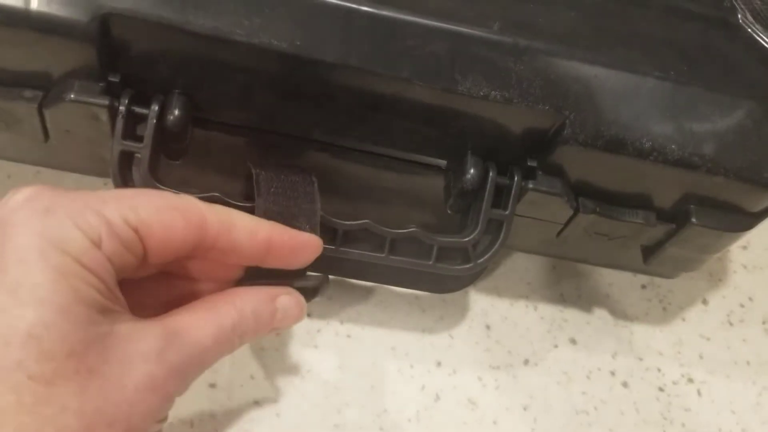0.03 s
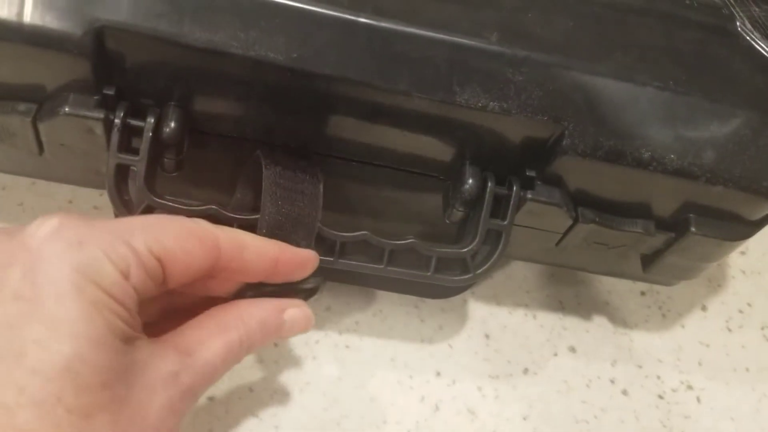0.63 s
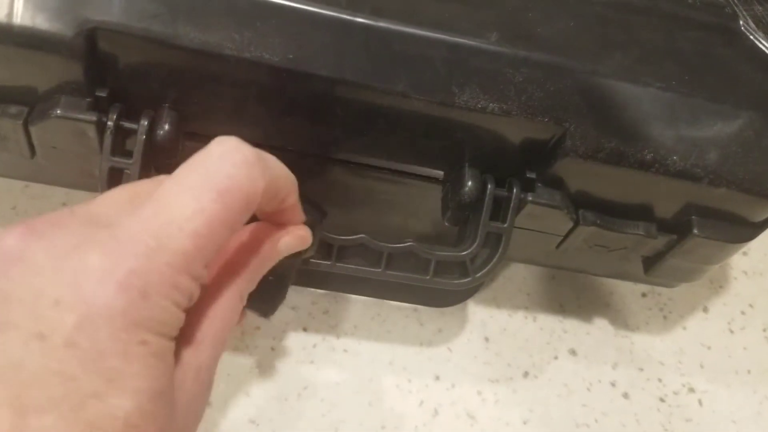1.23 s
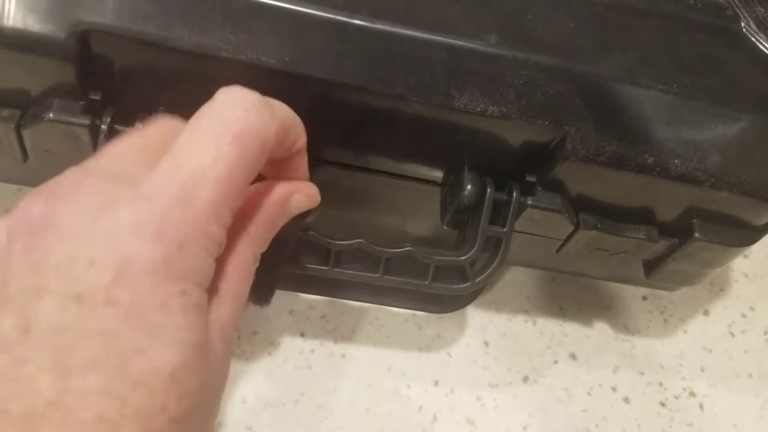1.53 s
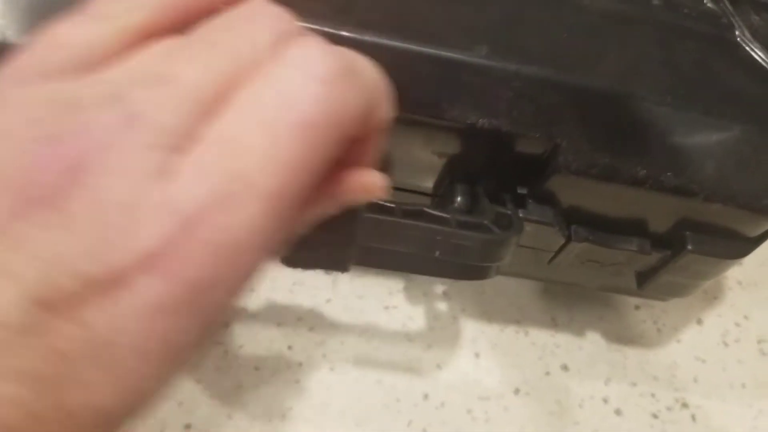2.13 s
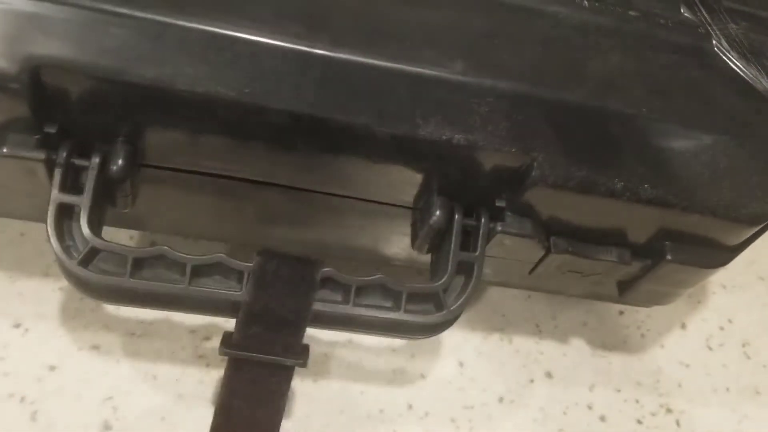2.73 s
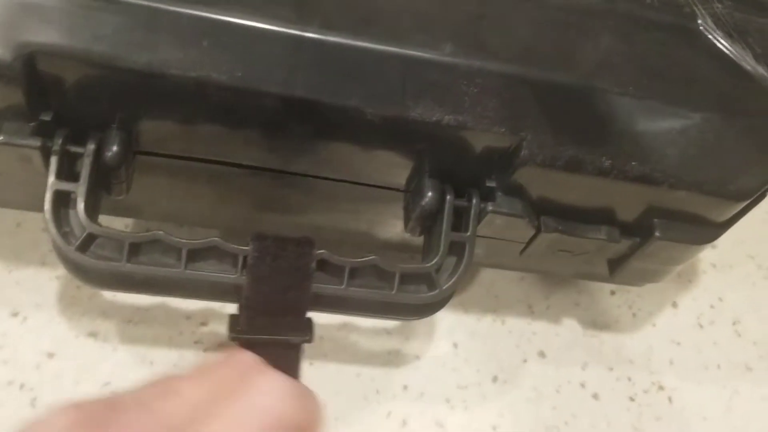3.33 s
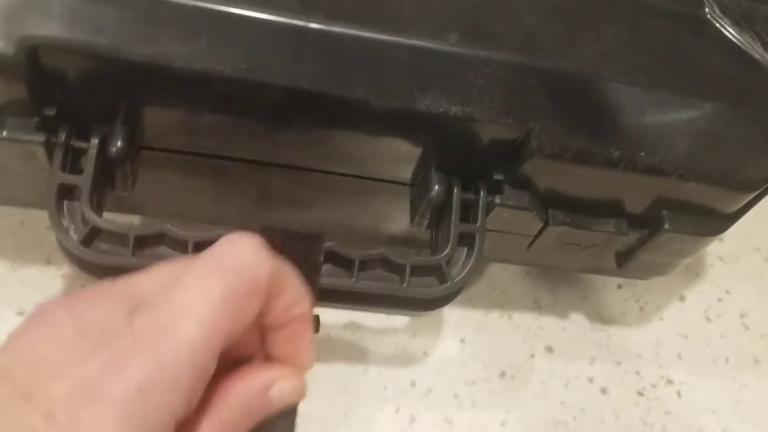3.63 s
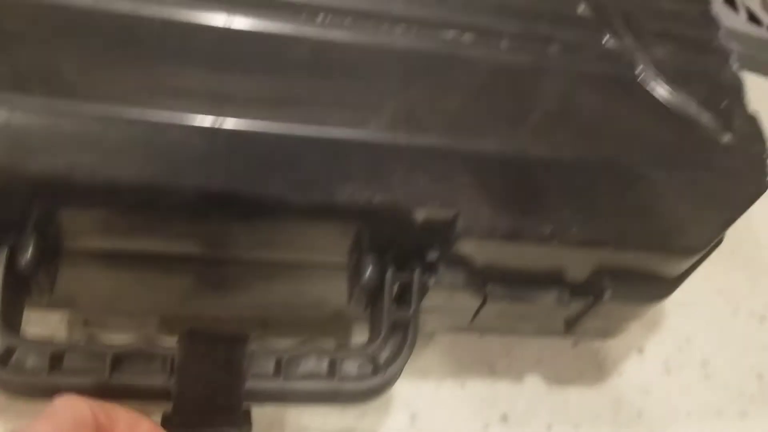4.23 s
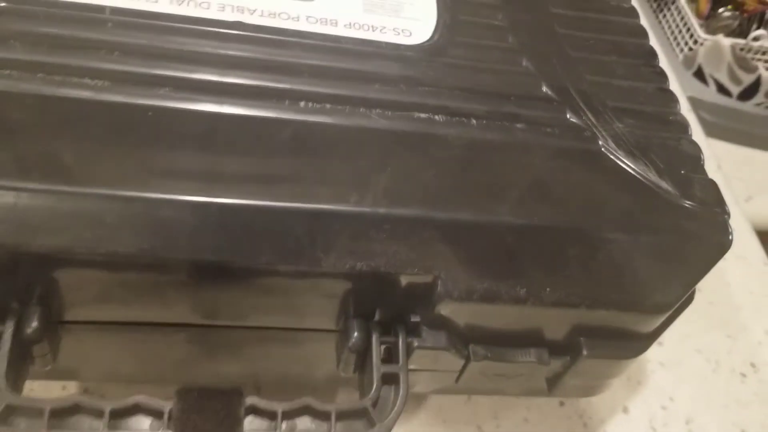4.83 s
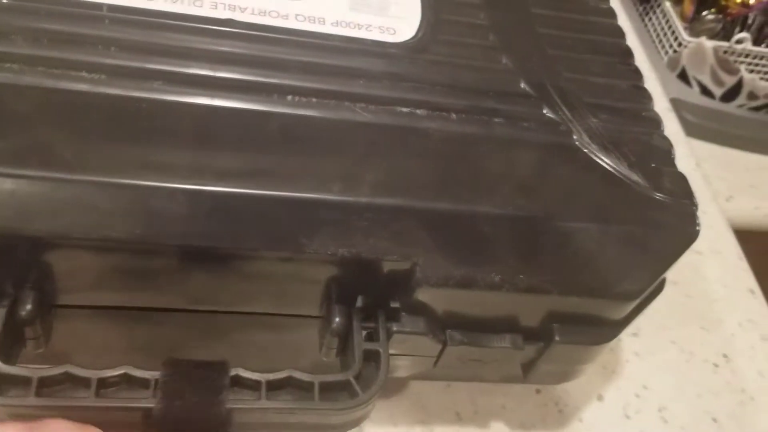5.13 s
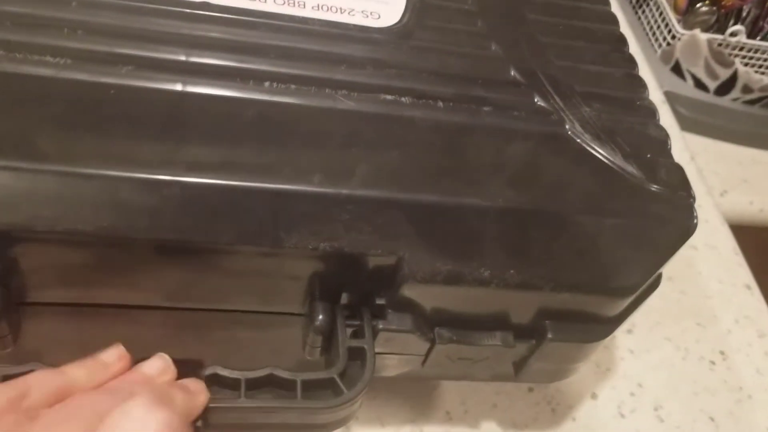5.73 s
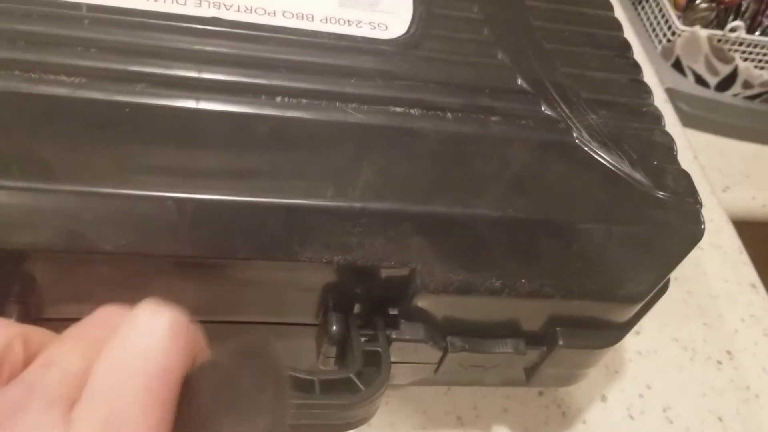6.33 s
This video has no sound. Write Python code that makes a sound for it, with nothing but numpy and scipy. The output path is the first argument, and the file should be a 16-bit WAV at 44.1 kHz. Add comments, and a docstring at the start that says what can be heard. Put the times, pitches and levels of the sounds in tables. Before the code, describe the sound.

A hook-and-loop strap is threaded around the hinged handle of a hollow plastic case. Faint ticks and a soft slide of webbing build, about two seconds in, to a cluster of hollow knocks, rattles and a short rasping rip. Lighter taps follow, then more brief crackles and a sharp snap as fingers press the strap shut. It is all heard close up in a small, quiet room.

```python
"""Fastening a hook-and-loop strap

A strap is threaded round the plastic handle of a portable grill case on a kitchen counter and pressed shut.
Hooks snap one by one and tear loose in short rips, the webbing slides, fingers shift it, and a soft hiss of
faint breathing and light rubbing comes and goes. The hinged handle knocks and judders, making the hollow case
ring. Two close microphones hear it all in a small, quiet room."""
import sys
import numpy as np
from scipy import signal
from scipy.fft import rfft, irfft
from scipy.io import wavfile
from scipy.ndimage import uniform_filter1d

SR = 44100
rng = np.random.default_rng(int(sys.argv[2]) if len(sys.argv) > 2 else 0)


def store_pcm(level_fs):
    """Save levels as 16-bit WAV."""
    pcm = np.round(np.clip(level_fs, -1, 1) * 32767).astype(np.int16)
    wavfile.write(sys.argv[1], SR, np.atleast_2d(pcm).T)


N = 285369
TIME = np.arange(N) / SR

# Levels in tables are relative. A "t60" is the time in seconds a sound takes to fade by 60 dB.
# the tone of a hook letting go: f/Hz, level/dB
HOOK_TONE = [(50, -29.5), (200, -11.5), (1000, -15), (2800, -5), (4300, 3), (5500, 0.5), (7200, 1),
             (8500, -2.5), (10500, -0.5), (12500, 0.5), (15000, 3.5), (16500, -6.5)]
# the handle hitting the case: t/s, weight/dB, hardness/dB, panel pitch/Hz
HANDLE_KNOCKS = [(0.095, -36, -39, 1170), (.151, -66, -46.5, 1940), (.862, -59, -49, 1870),
                 (0.912, -47.5, -59, 1900), (1.295, -37.5, -44.5, 1250), (1.524, -41.5, -52.5, 1580),
                 (1.654, -35.5, -38.5, 1190), (1.84, -32.5, -41.5, 1340), (1.878, -36, -40.5, 1090),
                 (1.923, -38, -32, 1130), (1.946, -27.5, -30.5, 1110), (1.983, -24, -33, 1960),
                 (2.02, -35.5, -37, 1080), (2.177, -22, -31.5, 1580), (2.229, -26, -26.5, 1030),
                 (2.253, -24.5, -27.5, 1060), (2.297, -27, -58, 1060), (2.402, -36.5, -56.5, 2130),
                 (2.485, -31, -42, 1160), (2.531, -36, -38.5, 900), (2.567, -23, -43, 845),
                 (2.587, -21.5, -34, 1170), (2.624, -26, -52, 880), (2.662, -30, -32, 1250),
                 (2.685, -21.5, -49, 1290), (2.701, -32, -33.5, 880), (2.856, -29.5, -48, 1020),
                 (2.95, -25.5, -37, 1530), (3.118, -33.5, -43, 860), (3.235, -36.5, -61, 1100),
                 (3.488, -45, -43, 2160), (3.518, -32.5, -35.5, 1640), (3.548, -41, -49, 1560),
                 (3.687, -27, -37, 870), (4.017, -44.5, -64, 1080), (4.339, -32.5, -58.5, 930),
                 (4.489, -38, -55, 1510), (4.606, -30.5, -42.5, 1580), (4.645, -33, -42.5, 1220),
                 (4.73, -29.5, -36.5, 1600), (4.801, -30.5, -38.5, 1450), (4.853, -29, -42, 910),
                 (4.918, -67, -42, 1040), (4.995, -30, -42, 1010), (5.084, -39, -59, 1110),
                 (5.157, -35, -43.5, 1440), (5.259, -29, -28.5, 950), (5.436, -24.5, -37, 1370),
                 (5.602, -32, -67, 870), (5.743, -40, -60, 980), (6.071, -41.5, -55.5, 1160),
                 (6.266, -30.5, -54, 1020), (6.306, -24.5, -51.5, 846), (6.342, -70, -39.5, 1160)]
# the notes (modes) at which the hollow case and handle ring: f/Hz, level/dB, t60/s
CASE_MODES = [(118.1, -17, 0.38), (157.7, -5.5, 0.14), (198, -7, 0.041), (313.6, -4, 0.055),
              (335.2, 0, 0.11), (406, -8.5, 0.043), (517, -9, 0.027), (637.4, -2, 0.092), (733, -14, 0.072),
              (969, -13, 0.023), (1062.6, -11.5, 0.082), (1195, -15, 0.092), (1274, -16.5, 0.065),
              (1340, -13.5, 0.024), (1580, -15.5, 0.054), (1710, -29.5, 0.017), (2080, -13.5, 0.04),
              (2240, -33.5, 0.066)]
# the tone of plastic hitting plastic: f/Hz, level/dB
CLACK_TONE = [(60, -38), (200, -9.5), (450, -0.5), (700, 1), (1300, -1.5), (2050, 0), (2550, -11),
              (5000, -17), (16000, -63)]


def hook_snaps(flutter_t60=0.021, stretch=0.14, click_db=14, ring_db=5, level_db=-15):
    """A hook springs free: a click, then fibres flutter. Loud snaps drag others along and last longer."""
    # single hooks letting go and small dry ticks: t/s, level/dB, f/Hz
    snaps = [(0.152, -39, 4650), (0.528, -20, 13900), (0.5363, -20, 14200), (0.5732, -27, 14100),
             (.584, -27, 6900), (0.5913, -18.5, 9400), (0.62, -26, 6100), (0.6402, -32, 7540),
             (.656, -30, 6700), (.715, -32, 6500), (.762, -25, 14000), (0.7712, -25, 5700),
             (0.915, -28.5, 6000), (0.9234, -30, 5330), (.9938, -31, 14100), (1.217, -32, 14000),
             (1.2818, -31, 14500), (1.4153, -33.5, 6000), (1.6487, -32.5, 4840), (1.7156, -31, 4100),
             (1.7766, -20, 5300), (1.8136, -29, 6260), (1.8449, -22, 4850), (1.954, -18.5, 13000),
             (1.9898, -7.5, 15200), (2.0195, -13, 15600), (2.1519, -37, 4550), (2.237, -10, 4600),
             (2.357, -35.5, 13000), (2.4826, -34.5, 4430), (2.537, -30.5, 3900), (2.567, -23, 3820),
             (2.589, -22, 4540), (2.6, -26, 4480), (2.624, -25.5, 3950), (2.6632, -24.5, 3870),
             (2.6858, -30.5, 5600), (2.704, -29, 3600), (2.8587, -38.5, 4300), (3.235, -35.5, 6300),
             (3.3646, -28, 7000), (3.46, -36, 6550), (3.5163, -35.5, 6400), (3.652, -32, 5900),
             (3.958, -34.5, 6860), (4.0198, -16, 4100), (4.1139, -27.5, 12400), (4.369, -24.5, 14600),
             (4.3988, -22.5, 15500), (4.423, -26.5, 13300), (4.4398, -23.5, 16100), (4.4647, -31.5, 4960),
             (4.473, -31, 14500), (4.5896, -14.5, 13800), (4.792, -26, 7200), (5.2599, -11.5, 6940),
             (5.8214, -27.5, 12900)]
    out, t = np.zeros((2, N)), TIME[:600]
    typical_db = np.median(np.array(snaps)[:, 1])
    for start, db, hz in snaps:
        t60 = flutter_t60 * from_db(stretch * (db - typical_db))
        flutter = noise_pair(len(t), alike_below_hz=16000) * decay(t, t60)
        burst = colour(flutter + from_db(click_db) * (t == 0), HOOK_TONE)
        burst = burst + from_db(ring_db) * resonate(burst, hz, hz / 3)
        top_hz = min(2.6 * hz, .45 * SR)   # a low snap reaches less far into the treble
        burst = signal.sosfilt(signal.butter(2, top_hz, fs=SR, output="sos"), burst)
        add(out, start, from_db(db + level_db) * unit_rms(burst))
    return out


def strap_pulls(webbing_db=-4, taut_db=6, taut_width_hz=450):
    """With each pull, hooks tear in a dense crackle while the taut weave rasps through the buckle."""
    # pulls, rising and falling by 20 dB: peak t/s, rise/s, fall/s, tearing/dB, sliding/dB, f/Hz
    pulls = [(0.789, 0.01, 0.069, -42, -44.5, 1640), (1.434, 0.0088, 0.026, -54, -42.5, 4800),
             (1.594, 0.08, 0.0074, -38.5, -36, 4800), (1.599, 0.014, 0.032, -41, -25.5, 1700),
             (1.778, 0.0068, 0.062, -52, -35.5, 4700), (1.986, 0.12, 0.035, -51, -39, 1470),
             (2.034, 0.028, 0.033, -27.5, -32, 3700), (2.153, 0.0067, 0.03, -22.5, -33, 3830),
             (2.167, 0.012, 0.051, -23, -20, 4420), (2.183, 0.0041, 0.027, -14.5, -15.5, 5400),
             (2.194, .0053, 0.049, -53, -22, 1370), (2.238, 0.0015, 0.034, -42, -23, 4430),
             (4.023, 0.033, 0.0098, -30.5, -53, 3930), (4.589, .006, 0.094, -33.5, -43.5, 3700),
             (4.651, 0.038, 0.018, -30, -31.5, 5000), (4.999, .05, .029, -45, -55, 4730),
             (5.252, .031, .044, -32.5, -28.5, 4970), (5.2605, 0.0006, 0.001, -12, -14, 1020),
             (6.06, 0.054, 0.059, -55, -52.5, 3700)]
    # the tone of sliding webbing: f/Hz, level/dB
    webbing_tone = [(50, -47), (200, -16.5), (800, -15.5), (1300, -6), (1700, -0.5), (2600, -0.5),
                    (3400, 2), (4400, -1), (5600, -8.5), (7200, -17), (9000, -19), (16000, -27.5)]
    tearing, sliding = np.zeros(N), np.zeros((2, N))
    weave = colour(tiny_slips(per_s=3100, spread_db=4.5, even_s=0.072), webbing_tone)
    for peak, rise, fall, tear_db, slide_db, hz in pulls:
        span = slice(max(int((peak - 2 * rise) * SR), 0), int((peak + 2 * fall) * SR))
        t = TIME[span] - peak
        pull = from_db(-20 * np.where(t < 0, (t / rise) ** 2, t / fall))
        tearing[span] += from_db(tear_db) * pull
        rasp = from_db(slide_db + webbing_db) * pull * weave[:, span]
        sliding[:, span] += rasp + from_db(taut_db) * resonate(rasp, hz, taut_width_hz)
    crackle = tiny_slips(per_s=2300, spread_db=0, even_s=0.0093)
    return sliding + colour(tearing * crackle, HOOK_TONE)


def handle_knocks(thump_db=-3, ring_db=9, clack_db=3, thud_db=-11, panel_db=4, vary_db=3,
                  detune=0.022, contact_s=0.00083, softening=0.36, graze_db=-15, graze_s=0.0098):
    """A blow rings the case: its weight drives low notes and a thud, its hardness high notes and a clack."""
    out, t = np.zeros((2, N)), TIME[:SR // 4]
    hz, mode_db, t60 = np.transpose(CASE_MODES)
    signs = (-1) ** np.arange(len(hz))[:, None]
    decays = signs * decay(t, t60[:, None])
    upper = at_hz([(380, 0), (950, 0.68)], hz)   # how far each mode follows hardness, not weight
    for start, weight_db, hard_db, panel_hz in HANDLE_KNOCKS:
        spot, grip = rng.standard_normal((2, len(hz)))
        gripped_hz = hz * (1 + detune * grip * (1 - upper))   # the hand's grip shifts the low modes
        modes = decays * np.sin(2 * np.pi * gripped_hz[:, None] * t)
        strength_db = (1 - upper) * (weight_db + thump_db) + upper * (hard_db + ring_db)
        ring = from_db(mode_db + strength_db + vary_db * spot) @ modes
        contact = noise_pair(len(t), alike_below_hz=5300)
        clack = from_db(hard_db + clack_db) * colour(contact * decay(t, t60=0.045), CLACK_TONE)
        clack = clack + from_db(panel_db) * resonate(clack, panel_hz, width_hz=160)
        thud = from_db(weight_db + thud_db) * case_thud(contact, t)
        # a heavy, dull blow is a cushioned one and takes longer to build
        press_s = contact_s * from_db(softening * (weight_db - hard_db))
        blow = (ring + thud) * (1 - np.exp(-t / (2 * press_s))) + clack * (1 - np.exp(-t / contact_s))
        add(out, start, blow)
        add(out, start - graze_s, from_db(graze_db) * (thud + clack))   # it grazes before it lands
    return out


def case_thud(contact, t):
    """The dull part of a blow: the noise of contact, mostly bass and quickly gone."""
    # the tone of the thud: f/Hz, level/dB
    thud_tone = [(60, -21.5), (140, 0), (220, -2.5), (400, -11.5), (800, -10), (3000, -48.5)]
    return colour(contact * decay(t, t60=0.13), thud_tone)


def handle_judder(held_db=-74.5, level_db=-3):
    """The pivots stick and slip, shaking the case while the handle turns or settles."""
    # the handle turning: t/s, length/s, shudder/dB, scrape/dB
    turns = [(0.077, 0.048, -65, -53), (0.29, 0.29, -75, -83), (.77, 0.14, -60.5, -61),
             (1.54, 0.48, -56.5, -58), (1.908, 0.13, -40, -34.5), (2.194, 0.13, -44.5, -50),
             (2.537, .16, -35, -44), (2.8, 0.91, -57.5, -64), (4.348, 0.34, -56.5, -55.5),
             (4.58, 0.45, -53, -51), (5.206, 0.072, -41.5, -43), (5.47, 0.98, -61, -72),
             (6.299, 0.048, -44, -44)]
    shudder, scrape = handle_settling()
    shudder = shudder + from_db(held_db)
    for start, length, shudder_db, scrape_db in turns:
        turn = hand_move(start, length, attack_s=0.0083, release_t60=0.12)
        shudder = shudder + from_db(shudder_db) * turn
        scrape = scrape + from_db(scrape_db) * turn
    slips = tiny_slips(per_s=1300, spread_db=4, even_s=0.014, scatter_s=0.00021)
    body = 0
    for k, (hz, db, t60) in enumerate(CASE_MODES):
        mode = resonate(slips, hz, width_hz=np.log(1000) / (np.pi * t60))
        share = at_hz([(170, 0.99), (650, 0.37), (2000, 0.021)], hz)   # low modes shake most
        body = body + (-1) ** k * from_db(db) * share * mode
    return from_db(level_db) * (shudder * unit_rms(body) + scrape * colour(slips, CLACK_TONE))


def handle_settling(level_db=-22, t60=0.41):
    """Each knock leaves the handle rattling: gives the fading strengths of its shudder and scrape."""
    blows = np.zeros((2, N))
    for start, weight_db, hard_db, _ in HANDLE_KNOCKS:
        blows[:, round(start * SR)] = from_db([weight_db, hard_db])
    return from_db(level_db) * signal.lfilter([1], [1, -decay(1 / SR, t60)], blows + 1e-18)


def fingers_and_breath(resting_db=-79.5, pressure_db=3):
    """Fingers shift the strap: lone hooks tick over a soft hiss of faint breathing and light rubbing."""
    # fingers shifting or smoothing the strap: t/s, length/s, ticking/dB, hiss/dB
    shifts = [(0.481, 0.2, -52, -66), (0.708, 0.22, -54.5, -58), (1.064, 0.26, -57, -72),
              (1.7, 0.46, -50, -54), (1.895, 0.099, -40.5, -50), (2.16, 0.23, -52.5, -53),
              (2.467, 0.29, -77, -55), (2.8, 0.26, -64, -104), (3.305, 0.12, -61.5, -60),
              (3.472, .2, -53, -66), (4.342, 0.36, -54, -56.5), (4.737, 0.67, -68, -61.5),
              (5.412, .38, -64.5, -69), (5.796, 0.11, -58, -58.5), (5.922, 0.5, -75, -63.5)]
    # the tone of the hiss of faint breathing and light rubbing: f/Hz, level/dB
    hiss_tone = [(200, -13.5), (1500, -9), (2300, 7.5), (3000, -3), (4400, 6.5), (7200, -2.5),
                 (8600, -11.5), (11000, -4), (15000, 1), (16500, -5)]
    ticking = hissing = from_db(resting_db)
    for start, length, tick_db, hiss_db in shifts:
        move = hand_move(start, length, attack_s=0.0087, release_t60=0.085)
        ticking = ticking + from_db(tick_db) * move
        hissing = hissing + from_db(hiss_db) * move
    ticks = tiny_slips(per_s=220, spread_db=3, even_s=0.17)
    hiss = noise_pair(N, alike_below_hz=18000) * from_db(pressure_db * wander(points=80))
    return counter_bounce(colour(ticking * ticks, HOOK_TONE)) + colour(hissing * hiss, hiss_tone)


def counter_bounce(x, lag_s=0.000699, sway=0.447, bounce_db=-6):
    """The stone counter sends each snap back after a short delay that wanders as the hand moves."""
    sent_at = TIME - lag_s * (1 + sway * wander(points=40))
    echo = np.array([np.interp(sent_at, TIME, channel) for channel in x])
    return (x + from_db(bounce_db) * echo) / np.hypot(1, from_db(bounce_db))


def room_echo(x, level_db, gap_s=0.0057):
    """Many reflections blur into a short tail, each band of pitch fading at its own rate."""
    # how long the room rings: f/Hz, t60/s
    room_decay = [(120, 0.15), (500, 0.17), (2000, 0.16), (5000, 0.18), (14000, 0.13)]
    t = TIME[:SR // 2]
    noise, tail = noise_pair(len(t), alike_below_hz=700), 0
    edges = np.geomspace(60, 18000, 9)
    for low, high in zip(edges, edges[1:]):
        band = signal.sosfilt(signal.butter(2, [low, high], "band", fs=SR, output="sos"), noise)
        tail = tail + band * decay(t, at_hz(room_decay, np.sqrt(low * high)))
    tail = unit_rms(tail * (t > gap_s)) / np.sqrt(len(t))
    return from_db(level_db) * signal.fftconvolve(x, tail, axes=1)[:, :N]


def room_air(air_db=-63.5, rumble_db=-73):
    """The quiet room: a faint, steady hush and a low rumble that is unrelated left and right."""
    # the tone of the hush: f/Hz, level/dB
    air_tone = [(25, 1), (80, 2.5), (125, 5), (220, -6), (420, -30.5), (630, -15.5), (850, -21),
                (1600, -23.5), (3000, -23.5), (4500, -22.5), (7000, -22.5), (9000, -26.5), (14000, -23.5),
                (16000, -37)]
    rumble_tone = [(20, -6), (50, -0.5), (90, 14.5), (170, -19.5), (1000, -75.5)]
    air = unit_rms(colour(noise_pair(N, alike_below_hz=360), air_tone))
    rumble = colour(rng.standard_normal((2, N)), rumble_tone)
    return from_db(air_db) * air + from_db(rumble_db) * rumble


def tiny_slips(per_s, spread_db, even_s, scatter_s=.00003):
    """Random clicks of uneven size, with their power evened out over spans of even_s seconds."""
    sizes = from_db(spread_db * np.minimum(rng.exponential(1, N), 4)) * rng.choice([-1, 1], N)
    clicks = sizes * (rng.random(N) < per_s / SR)
    local_power = np.abs(uniform_filter1d(clicks ** 2, int(even_s * SR)))
    clicks = clicks / np.sqrt(local_power + 1e-4)
    # each slip has its own spot, so its own arrival time on the right
    arrival = np.rint((TIME + scatter_s * rng.standard_normal(N)) * SR).astype(int)
    return np.array([clicks, np.bincount(arrival % N, clicks, N)])


def hand_move(start, length, attack_s, release_t60):
    """The strength of one movement: it builds up, holds and dies away."""
    t = TIME - start
    return np.clip(t / attack_s, 0, 1) * decay(np.maximum(t - length, 0), release_t60)


def noise_pair(count, alike_below_hz):
    """Noise at two close microphones: shared in the bass, less alike in the treble."""
    mid, side = rng.standard_normal((2, count))
    high_pass = signal.butter(1, min(alike_below_hz, SR / 3), "high", fs=SR, output="sos")
    side = signal.sosfilt(high_pass, side)
    return np.array([mid + side, mid - side])


def from_the_side(x, lag_s):
    """Delay the right channel, rounded to whole samples."""
    late = np.clip(np.arange(N) - np.rint(lag_s * SR).astype(int), 0, N - 1)
    return np.array([x[0], x[1][late]])


def colour(x, tone, keep_power=True, size=4096):
    """Filter a sound to follow a tone curve (f/Hz, level/dB)."""
    gains = from_db(at_hz(tone, np.fft.rfftfreq(size, 1 / SR)))
    # minimum phase: the filter never rings ahead of the sound
    cepstrum = irfft(np.log(gains))
    cepstrum[1:size // 2] *= 2
    cepstrum[size // 2 + 1:] = 0
    response = irfft(np.exp(rfft(cepstrum)))
    if keep_power:
        response = response / np.linalg.norm(response)
    return signal.fftconvolve(x, response[None], axes=1)[:, :x.shape[1]]


def resonate(x, hz, width_hz):
    """Ring at one pitch, with a gain of 1 at the peak."""
    r = np.exp(-np.pi * width_hz / SR)
    feedback = [1, -2 * r * np.cos(2 * np.pi * hz / SR), r * r]
    return signal.lfilter([(1 - r * r) / 2, 0, (r * r - 1) / 2], feedback, x + 1e-18)


def wander(points):
    """A slow drift through random points between -1 and 1."""
    return np.interp(TIME, np.linspace(0, TIME[-1], points), rng.uniform(-1, 1, points))


def at_hz(curve, hz):
    """Read a curve on a log-frequency axis."""
    f, value = np.transpose(curve)
    return np.interp(np.log(np.maximum(hz, 1)), np.log(f), value)


def decay(t, t60):
    """Fade by 60 dB every t60 seconds."""
    return np.exp(-np.log(1000) * t / t60)


def from_db(db):
    """Turn decibels into a gain."""
    return 10 ** (np.asarray(db) / 20)


def unit_rms(x):
    """Scale to an average power of 1."""
    return x / np.sqrt(np.mean(x ** 2) + 1e-20)


def add(out, start_s, sound):
    """Mix a stereo sound in at a given time."""
    i = max(round(start_s * SR), 0)
    out[:, i:i + sound.shape[-1]] += sound[:, :N - i]


def scene():
    """Strap and case start out on the left, so they reach the right side later; room air lies beneath."""
    # the case's delay on the right shrinks as the microphones turn to face it: t/s, lag/s
    case_lag = [(2.7, .00014), (2.95, -.00003)]
    # the tone of the left microphone against the right: f/Hz, level/dB
    left_tone = [(100, -1.4), (400, -1), (1200, -2), (2400, -7), (4400, -3.5), (8000, 0), (15000, -0.5)]
    strap = from_db(0.5) * (counter_bounce(hook_snaps()) + strap_pulls() + fingers_and_breath())
    case = handle_knocks() + handle_judder()
    # the bass spreads into the room most
    boom = colour(case, [(150, 4.5), (400, -1.0), (800, -0.5), (2000, -0.5)], keep_power=False)
    strap = from_the_side(strap + room_echo(strap, level_db=-10), lag_s=.00016)
    lag_s = np.interp(TIME, *np.transpose(case_lag))
    case = from_the_side(case + room_echo(boom, level_db=-3.5), lag_s)
    left, right = strap + case
    left = colour(left[None], left_tone, keep_power=False)[0]
    return np.array([left, right]) + room_air()


def record(dry, peak_limit=.8, cutoff_hz=16000):
    """Round off the tallest peaks and cut the highest treble steeply."""
    rounded = peak_limit * np.tanh(dry / peak_limit)
    return signal.sosfilt(signal.ellip(10, .2, 80, cutoff_hz, fs=SR, output="sos"), rounded)


dry = scene()
out = record(dry)
store_pcm(out)
```